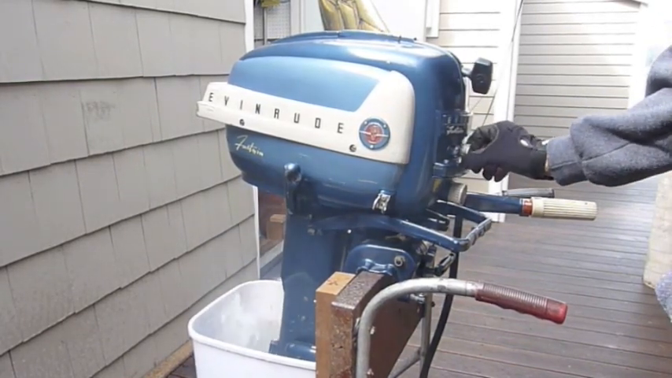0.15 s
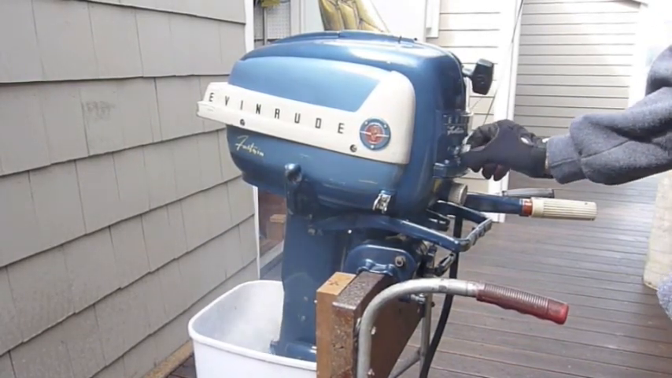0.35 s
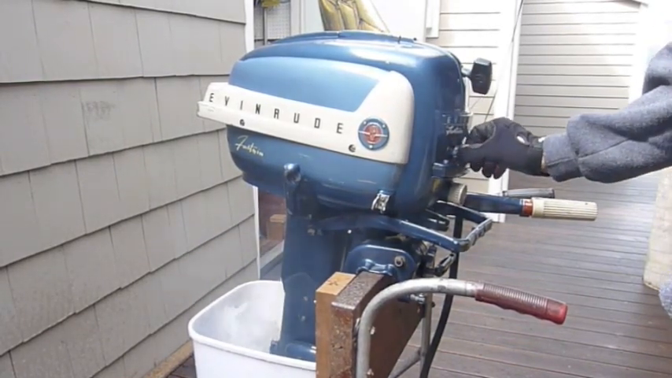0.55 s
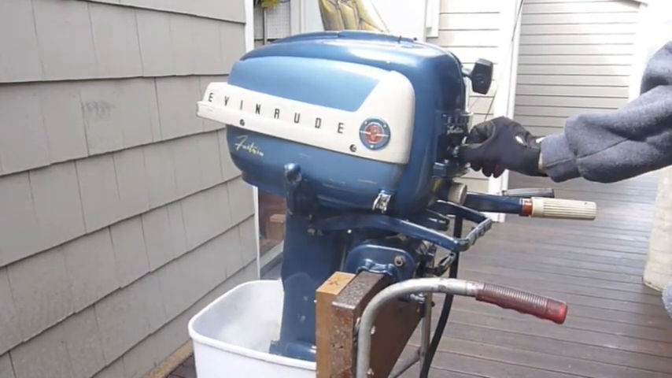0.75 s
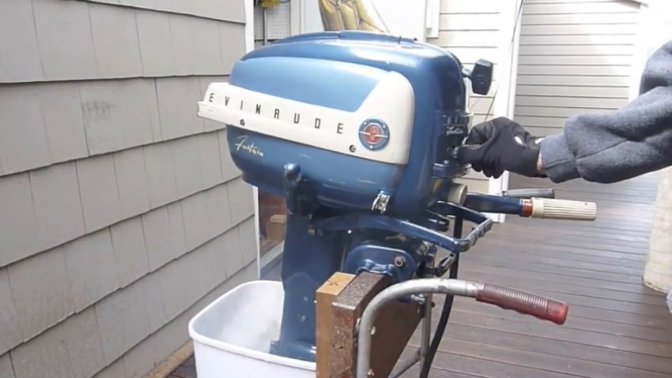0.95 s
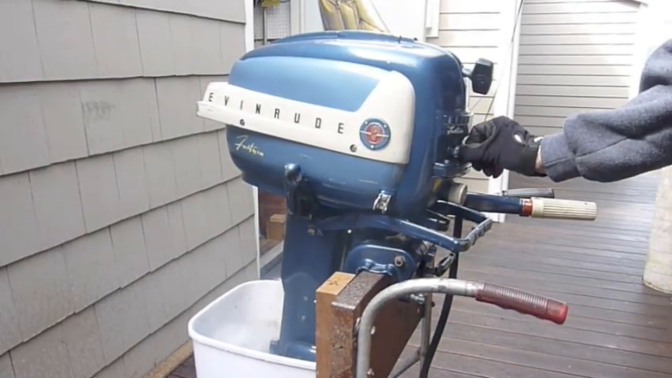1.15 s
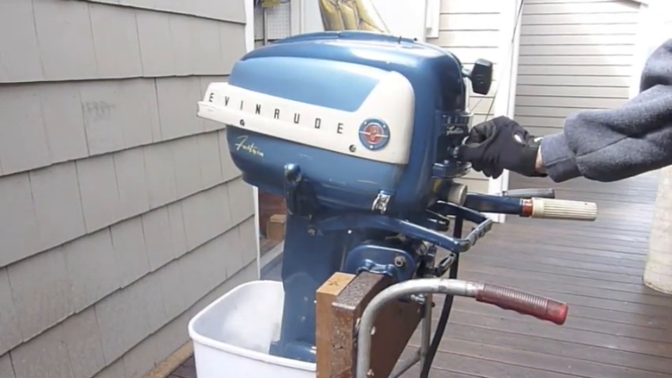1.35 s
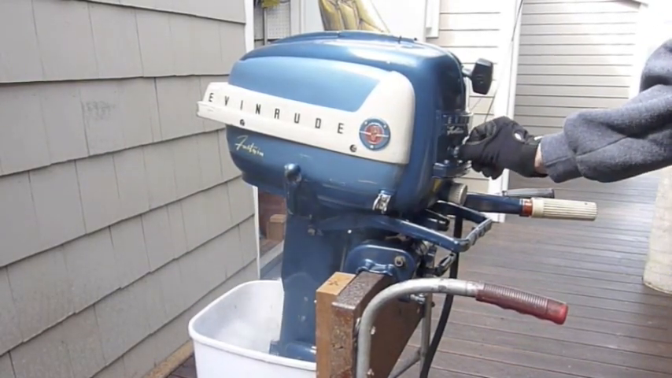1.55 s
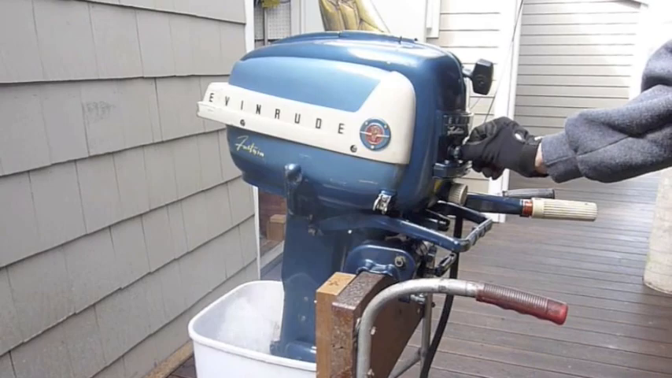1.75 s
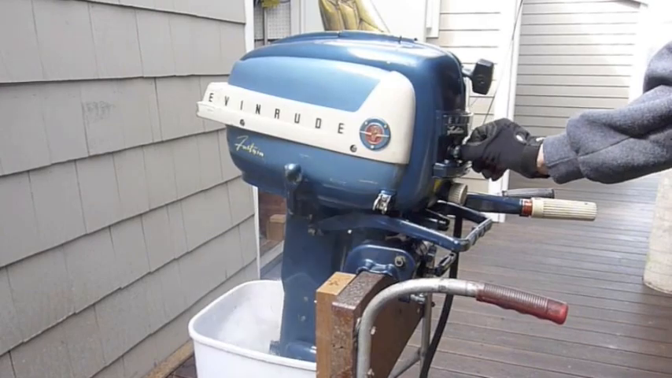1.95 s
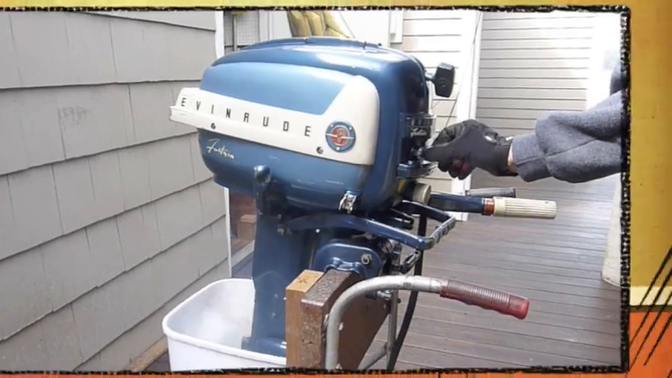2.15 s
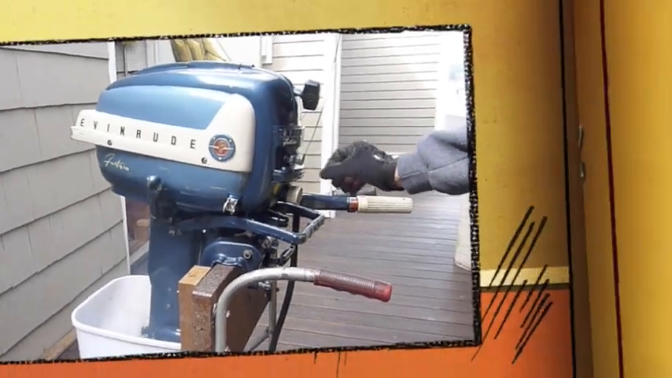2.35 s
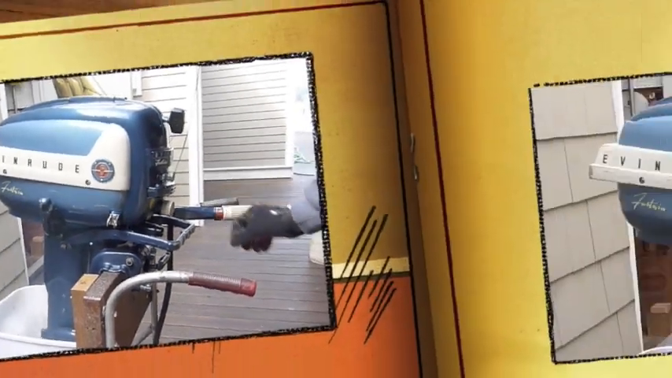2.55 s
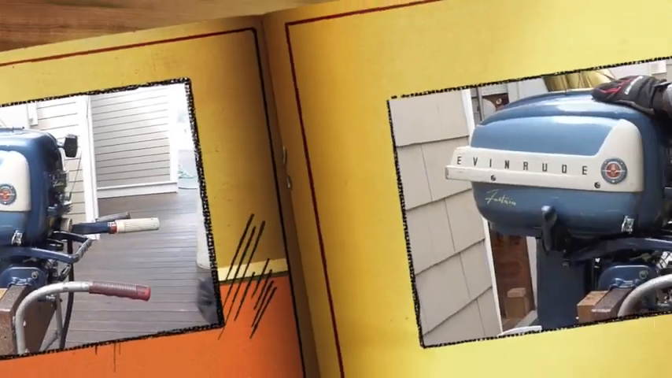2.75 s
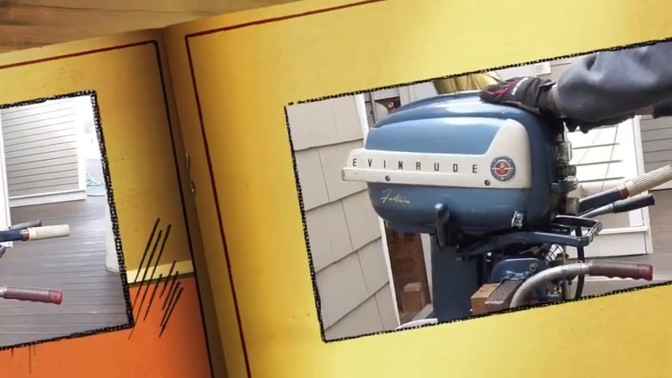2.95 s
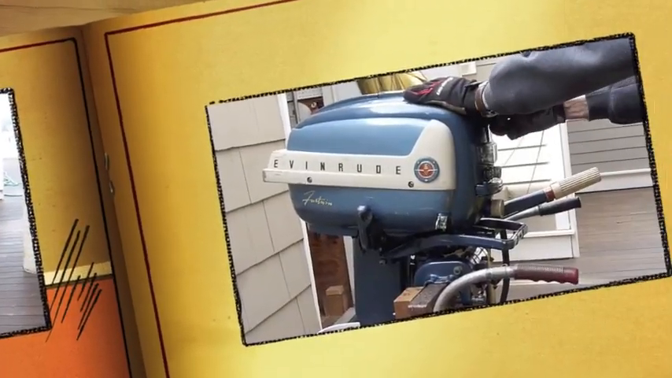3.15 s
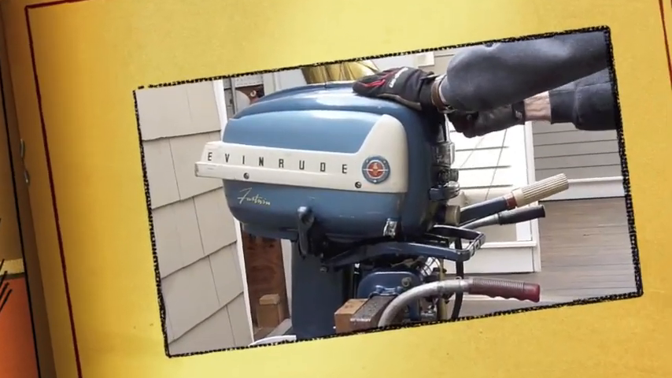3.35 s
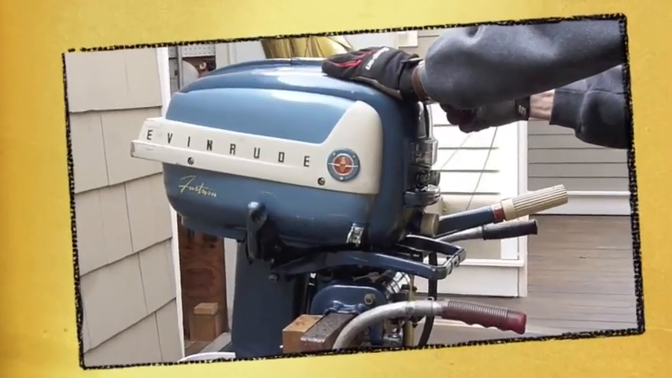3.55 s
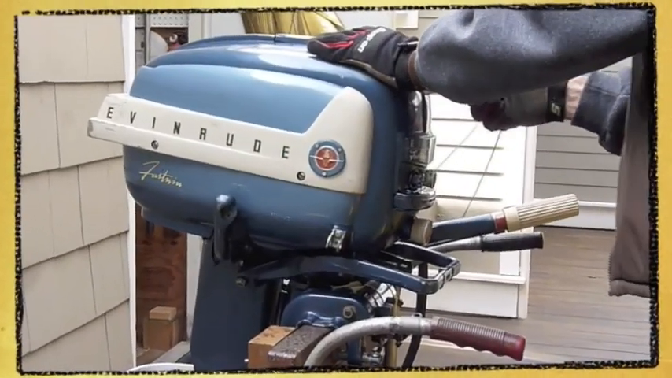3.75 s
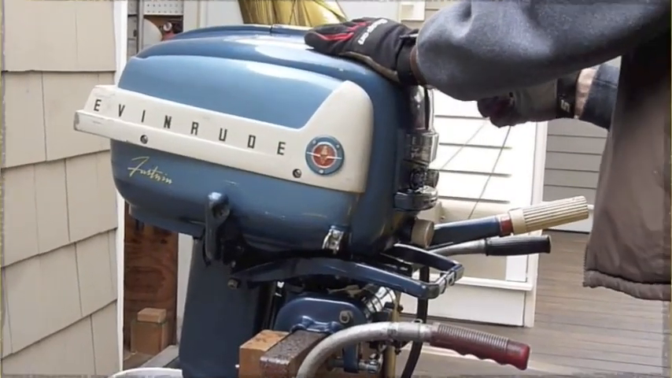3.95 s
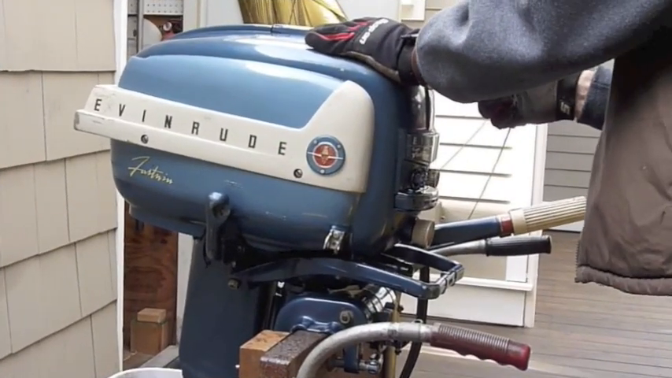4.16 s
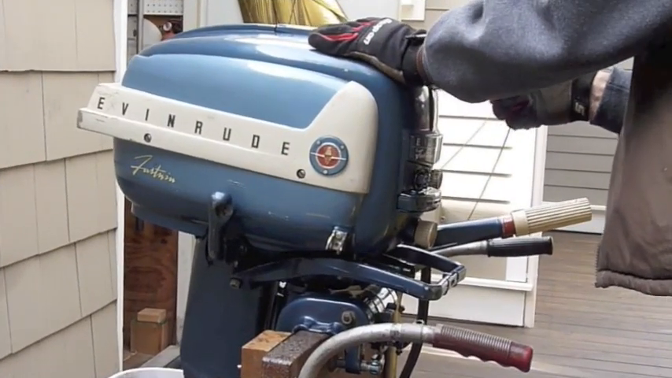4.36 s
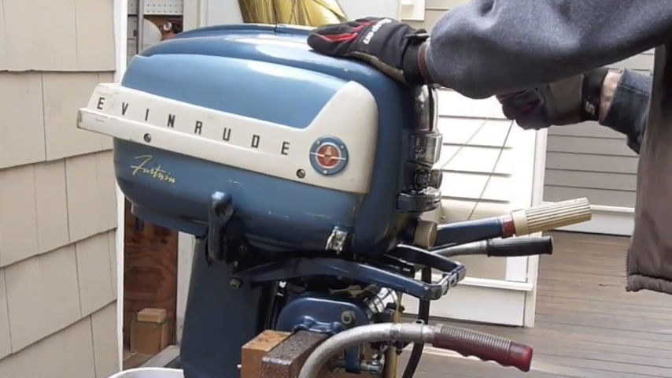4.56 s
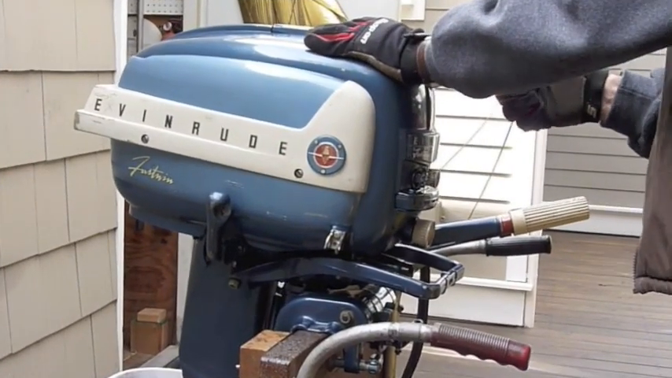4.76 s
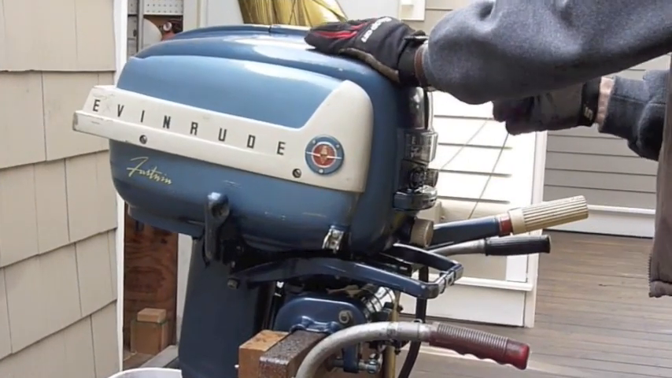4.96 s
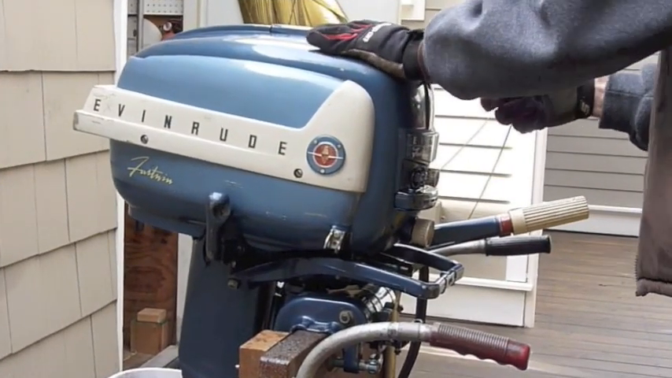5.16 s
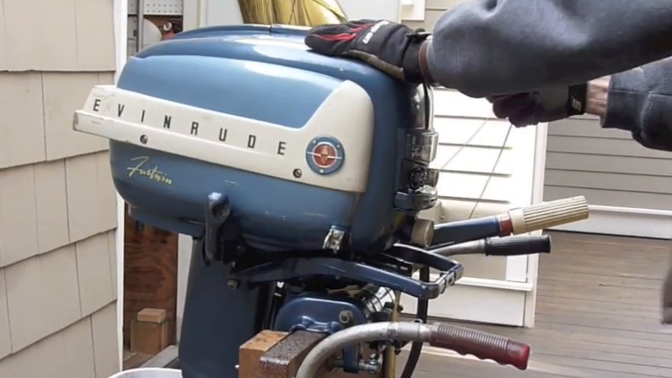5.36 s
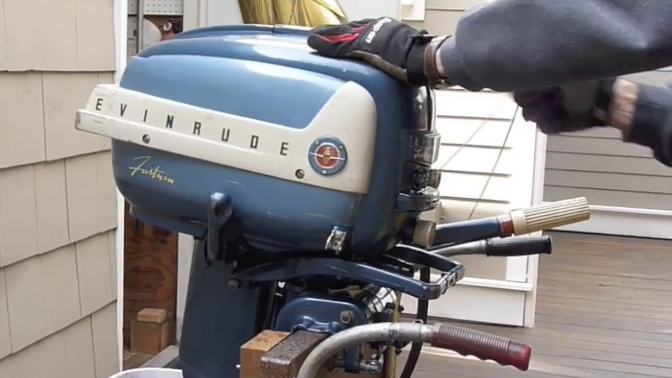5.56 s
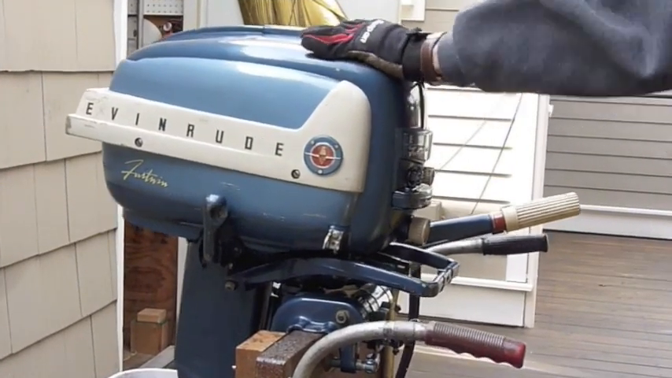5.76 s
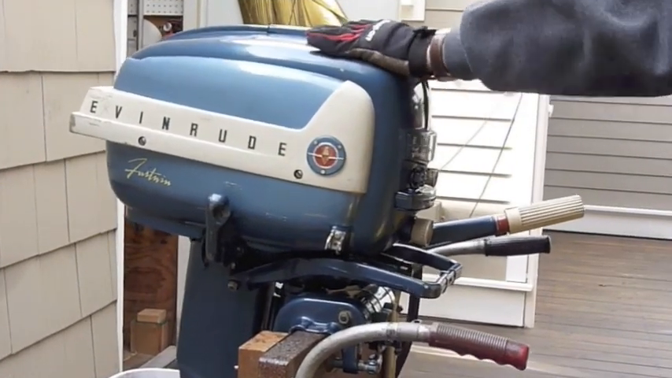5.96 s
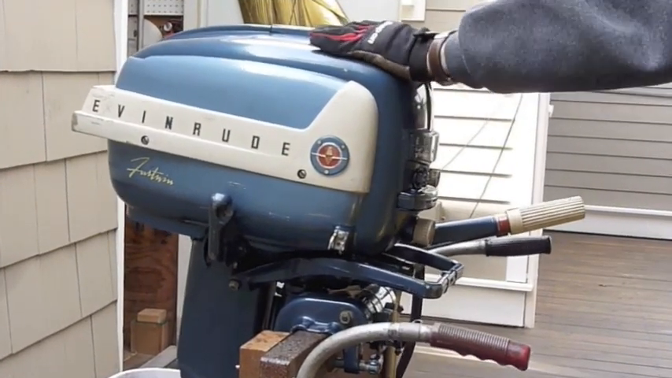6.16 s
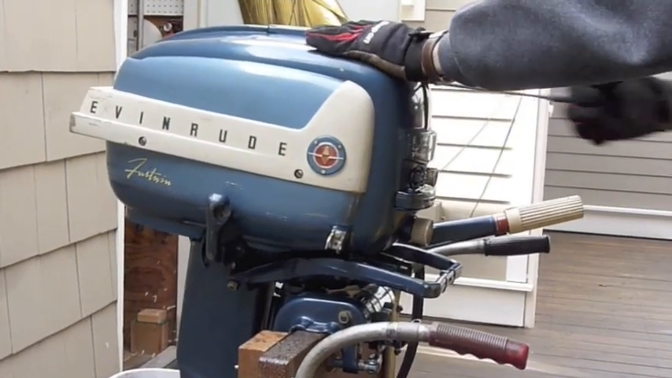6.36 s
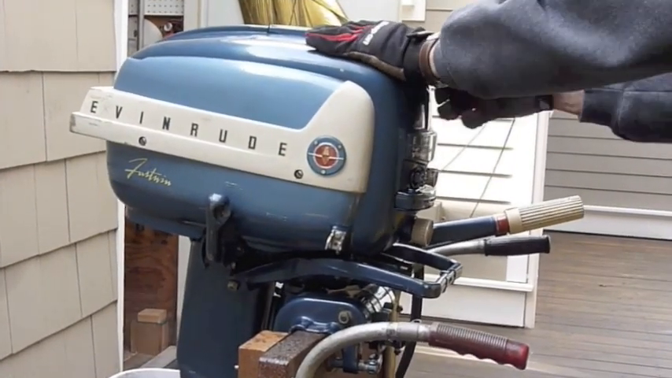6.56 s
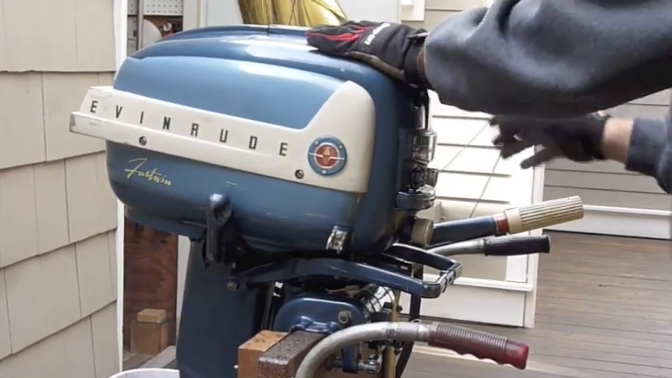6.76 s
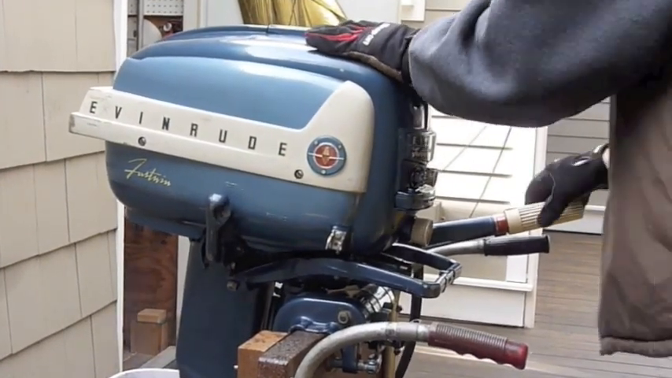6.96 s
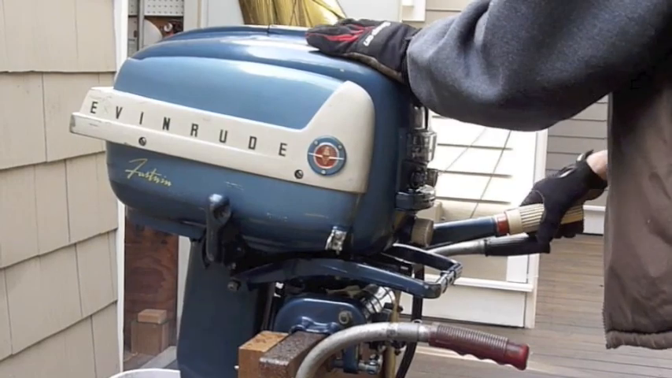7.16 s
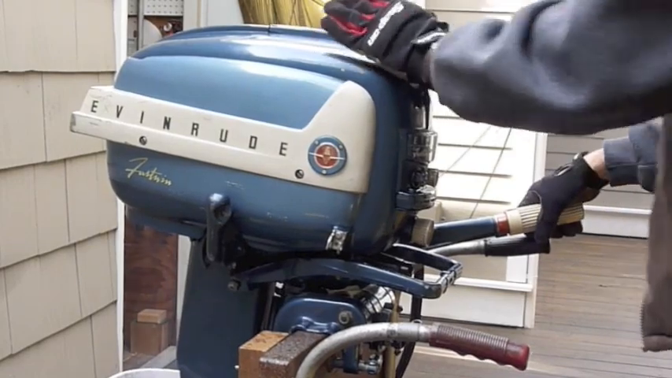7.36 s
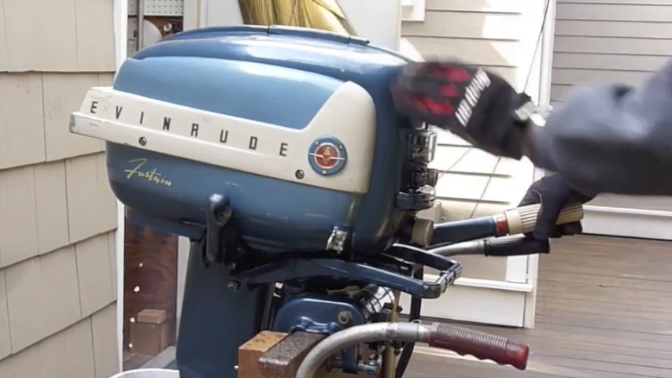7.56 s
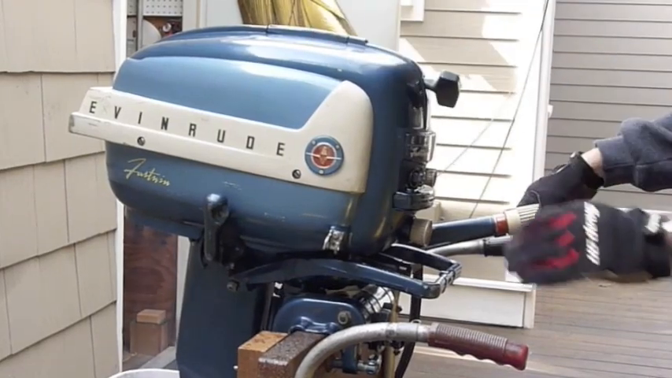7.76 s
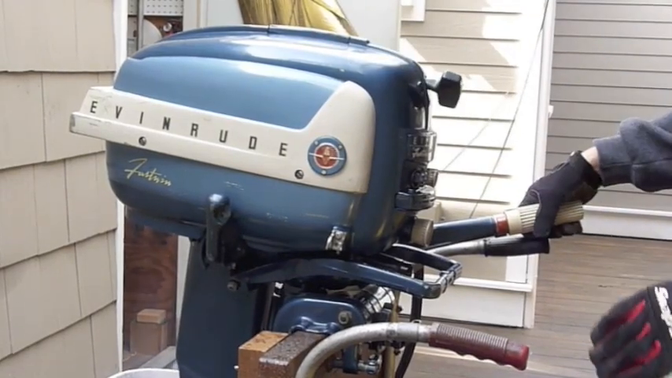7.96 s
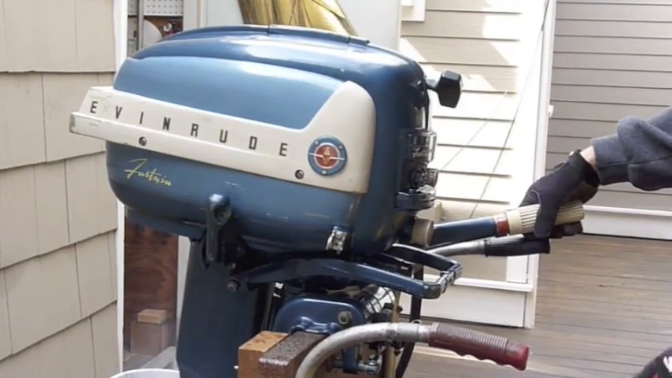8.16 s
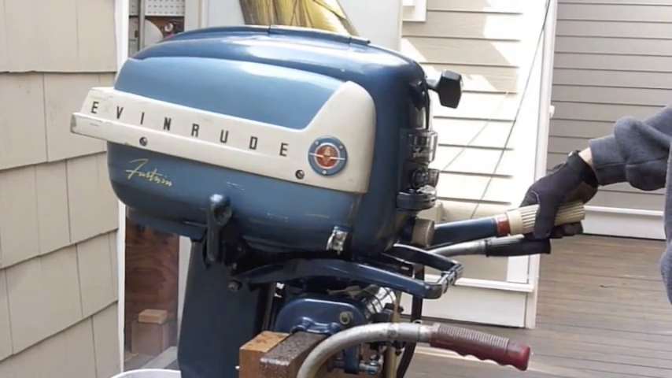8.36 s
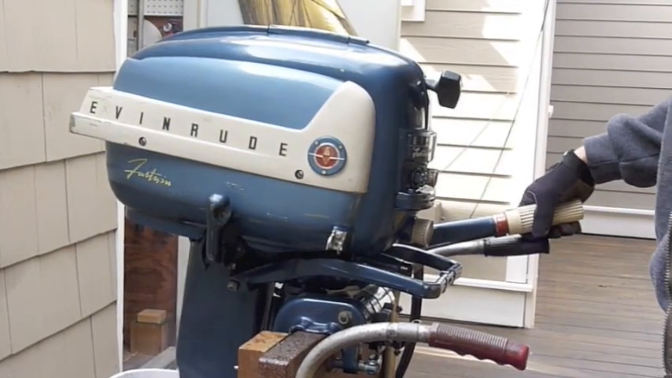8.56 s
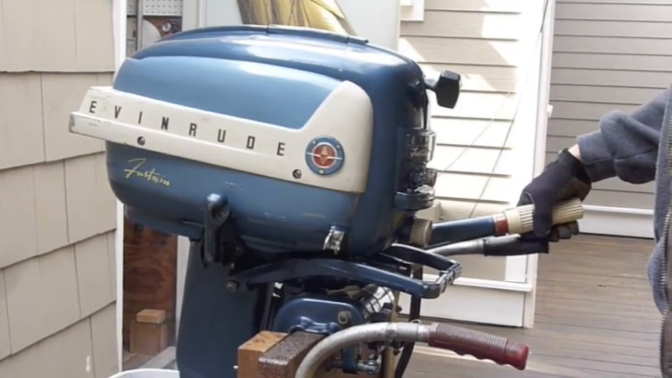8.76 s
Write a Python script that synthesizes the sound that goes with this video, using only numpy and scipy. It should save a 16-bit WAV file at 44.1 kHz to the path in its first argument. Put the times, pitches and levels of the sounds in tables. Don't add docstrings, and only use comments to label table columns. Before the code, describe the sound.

A small boat motor chugs at fast, loose idle, its exhaust popping and burbling in a water tub, with brief reflections from house walls. The sound dwindles to nothing. After quiet air, soft fumbling and sleeve rustle, a sharp rope yank rasps and ratchets; the engine fires, races briefly, then slows to uneven chugging until the end. The sound is slightly dull at the top.

```python
import sys
import numpy as np
from scipy import signal
from scipy.fft import rfft, irfft
from scipy.io import wavfile
from scipy.ndimage import uniform_filter1d

SR = 44100
rng = np.random.default_rng(int(sys.argv[2]) if len(sys.argv) > 2 else 0)


def materialize(psi):
    bounded = np.clip(np.atleast_2d(psi).T, -1, 1)
    quanta = np.round(bounded * 32767).astype(np.int16)
    wavfile.write(sys.argv[1], SR, quanta)


def natural_amplitude(level_db):
    exponent = np.asarray(level_db, float) / 20
    return 10 ** exponent


N = 388080
T = np.arange(N) / SR

CUT_S = 3.105
SLACK_S = 5.556

# [f/Hz, width/Hz, gain/dB]
TUB_IDLE = [(112, 17, -12), (144.13, 23.1, -7.5), (181, 43.7, -8.5), (238.6, 15.85, -1), (262.9, 28, -5),
            (328.3, 20.4, 0), (404.7, 44, -9), (473.4, 40.2, -6), (530, 42, -7.5), (634.7, 79, -8.5)]
TUB_START = [(149.5, 39, -13), (213, 11.45, -2.5), (237.9, 11.2, 2), (298, 13.4, 0), (339.8, 21.34, -3.5),
             (403.65, 35.8, -4.5), (445, 25, -7), (517, 45, -7), (597, 55, -8.5), (758, 41, -8)]
# [t/s, peak/dB, bubble note f/Hz]
POPS_IDLE = [(0.107, -17, 326), (0.152, -17, 333), (0.244, -19.5, 317), (0.288, -19, 250),
             (0.334, -16, 334), (0.387, -18, 301), (0.423, -14.5, 334), (0.516, -17.5, 323),
             (0.609, -21, 336), (0.663, -15, 320), (0.701, -16.5, 323), (0.884, -19, 325),
             (0.925, -14, 248), (1.019, -19, 220), (1.059, -17, 320), (1.113, -17, 246), (1.159, -17, 318),
             (1.192, -16, 330), (1.239, -11.5, 331), (1.283, -17, 458), (1.322, -16.5, 326),
             (1.417, -16, 180), (1.479, -18, 468), (1.513, -14, 320), (1.546, -16, 326),
             (1.593, -15.5, 326), (1.637, -13.5, 236), (1.681, -17, 242), (1.771, -11.5, 322),
             (1.829, -19, 447), (1.902, -16.5, 237), (1.946, -12, 318), (1.994, -15, 243),
             (2.084, -16, 299), (2.125, -15.5, 307), (2.17, -19, 331), (2.209, -17.5, 331),
             (2.302, -18.5, 323), (2.347, -16, 299), (2.476, -21.5, 324), (2.565, -20.5, 320),
             (2.611, -21, 245), (2.648, -22.5, 288), (2.693, -21.5, 302), (2.742, -22.5, 326),
             (2.783, -24.5, 248), (2.87, -29, 234), (2.912, -29, 320)]
POPS_START = [(6.145, -19, 231), (6.189, -16, 229), (6.229, -9, 296), (6.277, -10.5, 237),
              (6.383, -12.5, 231), (6.419, -10.5, 240), (6.45, -13, 248), (6.484, -13, 315),
              (6.521, -13, 301), (6.559, -11, 237), (6.59, -9, 298), (6.66, -11.5, 299), (6.696, -14, 234),
              (6.728, -10.5, 299), (6.796, -10.5, 296), (6.833, -16, 302), (6.865, -11.5, 299),
              (6.935, -12, 336), (6.969, -14, 242), (7.006, -7.5, 296), (7.078, -14, 242),
              (7.117, -14, 231), (7.153, -13, 296), (7.19, -13, 234), (7.227, -11, 223), (7.303, -12, 300),
              (7.354, -18.5, 237), (7.42, -17.5, 240), (7.462, -15.5, 294), (7.502, -15, 237),
              (7.575, -18.5, 240), (7.616, -14.5, 436), (7.696, -13.5, 226), (7.734, -15, 234),
              (7.775, -13.5, 295), (7.817, -11, 231), (7.859, -10, 230), (7.901, -14, 231),
              (7.938, -19, 213), (7.992, -17, 229), (8.028, -12, 296), (8.156, -17.5, 293),
              (8.201, -10.5, 345), (8.244, -11.5, 223), (8.283, -13, 221), (8.328, -16.5, 288),
              (8.377, -10.5, 369), (8.412, -13, 238), (8.449, -10.5, 295), (8.487, -10, 288),
              (8.532, -15, 221), (8.582, -21, 223), (8.615, -15, 296), (8.657, -13.5, 233),
              (8.696, -15.5, 218), (8.742, -14.5, 226)]


def evened(x):
    return x / np.sqrt(np.mean(x ** 2) + 1e-20)


def curve(rows, column=1):
    return np.interp(T, [r[0] for r in rows], [r[column] for r in rows])


def colour(x, points):
    hz, db = np.transpose(points)
    log_hz = np.log(np.fft.rfftfreq(N, 1 / SR) + 1)
    return irfft(rfft(x) * natural_amplitude(np.interp(log_hz, np.log(hz), db)), N)


def above(x, hz):
    return signal.sosfilt(signal.butter(3, hz, "high", fs=SR, output="sos"), x)


def ring(x, modes):
    out = np.zeros(len(x))
    for hz, width_hz, db in modes:
        r = np.exp(-np.pi * width_hz / SR)
        angle = 2 * np.pi * hz / SR
        gain = natural_amplitude(db) * 2 * (1 - r) * np.sin(angle)
        out += gain * signal.lfilter([0, 1], [1, -2 * r * np.cos(angle), r * r], x)
    return out


def train(s, size):
    keep = (s >= 0) & (s < N / SR - 1 / SR)
    return np.bincount((s[keep] * SR).astype(int), size[keep], N)


def die(clicks, t60):
    return signal.lfilter([1], [1, -10 ** (-3 / (t60 * SR))], clicks)


def fade():
    fade_out_s, fade_in_s = 0.96, 0.905
    return np.clip(np.maximum((CUT_S - T) / fade_out_s, (T - CUT_S) / fade_in_s), 1e-5, 1)


def unfaded_db(s, db):
    return db - 20 * np.log10(fade()[(s * SR).astype(int)])


def bursts(events, t60, tone, crest_db):
    s, db = np.transpose(events)
    envelope = uniform_filter1d(die(train(s, natural_amplitude(unfaded_db(s, db - crest_db))), t60), 50)
    return envelope * evened(colour(rng.standard_normal(N), tone))


def swell(start, end, db, rise_db, fall_db):
    return natural_amplitude(db - rise_db * np.maximum(start - T, 0) - fall_db * np.maximum(T - end, 0))


def turning(speed, turn):
    s = np.linspace(speed[0][0], speed[-1][0], num=400)
    rate = np.interp(s, *np.transpose(speed))
    return np.transpose([s, turn + (np.cumsum(rate) - (rate + rate[0]) / 2) * (s[1] - s[0])])


def moments(crank, place, jitter):
    s, turns = np.transpose(crank)
    whole = np.arange(np.floor(turns[0]) - 1, turns[-1] + 1)
    scattered = whole + place + jitter * rng.standard_normal(len(whole))
    return np.interp(scattered, turns, s, left=-1, right=-1)


def running(crank):
    on = uniform_filter1d(1. * (T >= crank[0][0]) * (T <= crank[-1][0]), 900)
    return on * ((T < CUT_S) == (crank[0][0] < CUT_S))


def blows(expected):
    # [t/s, peak/dB]
    blows_idle = [(0.0144, -19), (0.0611, -16), (0.1038, -16.5), (0.1486, -16), (0.196, -13.5),
                  (0.2423, -15.5), (0.2885, -16.5), (0.3346, -15.5), (0.379, -14), (0.4239, -16.5),
                  (0.4653, -17.5), (0.5108, -15.5), (0.5596, -15), (0.6095, -17), (0.654, -15),
                  (0.6988, -15.5), (0.7437, -15), (0.7911, -17.5), (0.8365, -14), (0.8844, -15),
                  (0.9258, -16), (0.9677, -17), (1.0141, -17), (1.0575, -16), (1.1024, -15.5),
                  (1.1453, -15.5), (1.1902, -15), (1.2334, -12.5), (1.278, -18), (1.3209, -17.5),
                  (1.3673, -16.5), (1.4127, -15.5), (1.4556, -14), (1.5, -16), (1.5454, -17),
                  (1.5918, -14.5), (1.6347, -14.5), (1.6781, -16), (1.7215, -17), (1.7649, -14),
                  (1.81, -15.5), (1.8535, -17), (1.8978, -17.5), (1.941, -17.5), (1.9879, -18),
                  (2.0338, -16), (2.0777, -16), (2.1213, -16), (2.1691, -15.5), (2.2116, -18),
                  (2.2997, -17), (2.3426, -18.5), (2.386, -17.5), (2.4322, -20.5), (2.4753, -19),
                  (2.5212, -23), (2.5636, -22), (2.6065, -22), (2.6953, -22.5), (2.8667, -26)]
    blows_start = [(6.1889, -16.5), (6.2305, -19.5), (6.2697, -18), (6.307, -17), (6.3455, -20.5),
                   (6.3824, -16.5), (6.4188, -17.5), (6.4515, -17.5), (6.4907, -16.5), (6.523, -16.5),
                   (6.557, -17), (6.5899, -19.5), (6.66, -14), (6.7326, -17), (6.795, -19.5), (6.8344, -20),
                   (6.864, -17), (6.9002, -19.5), (6.9416, -19), (6.9691, -19.5), (7.005, -18.5),
                   (7.0778, -19.5), (7.155, -18.5), (7.225, -19), (7.268, -18), (7.3088, -17),
                   (7.3457, -20.5), (7.379, -17.5), (7.4226, -19), (7.4586, -17), (7.4974, -19),
                   (7.5353, -15.5), (7.577, -16), (7.6126, -16.5), (7.6954, -19), (7.7388, -14),
                   (7.7753, -16), (7.8172, -18), (7.8566, -16.5), (7.9035, -19), (7.9414, -16),
                   (7.9846, -15), (8.0267, -15.5), (8.1105, -16.5), (8.1529, -17.5), (8.1983, -18),
                   (8.2452, -19), (8.2826, -18.5), (8.324, -15.5), (8.3674, -15), (8.4113, -17),
                   (8.4487, -18.5), (8.4901, -20.5), (8.5295, -18), (8.5746, -17.5), (8.6133, -19.5),
                   (8.6533, -20), (8.6957, -18), (8.7384, -18), (8.783, -17)]
    average_db = -16.5
    s, db = np.transpose(blows_idle + blows_start)
    db = unfaded_db(s, db - average_db)
    near = np.abs(s - expected[:, None]).argmin(axis=1)
    found = np.abs(s[near] - expected) < .014
    return found * (s[near] - expected), np.where(found, db[near], -2.5)


def patchy(x, crank):
    z = signal.stft(x, nperseg=256)[2]
    frame_at = np.minimum(np.arange(z.shape[1]) * 128, N - 1)
    turn = np.floor(curve(crank) + .1).astype(int)[frame_at]
    tint = evened(uniform_filter1d(rng.standard_normal((turn.max() + 1, len(z))), size=6, axis=1))
    tint_db = 1.5 * tint[turn].T
    return signal.istft(z * natural_amplitude(tint_db), nperseg=256)[1][:N]


def clatter(crank, strikes, spectrum, cowl, uneven_db, bed, whirr_db, cowl_db):
    power = bed * running(crank)
    late_s, hard_db = blows(moments(crank, strikes[0][0], 0))
    for k, (place, db, t60) in enumerate(strikes):
        s = moments(crank, place, .012 * (k > 0)) + late_s
        if k < 2:
            db = db + 0.6 * hard_db
        else:
            db = db + uneven_db * rng.standard_normal(len(s))
        power += die(train(s, natural_amplitude(2 * db)), t60 / 2)
    shake = np.sqrt(uniform_filter1d(power, 30) + 1e-12)
    tick_size = natural_amplitude(2.29 * np.minimum(rng.exponential(1, N), 4))
    ticks = (rng.random(N) < 1800 / SR) * tick_size * rng.choice([-1, 1], N)
    panel = rng.integers(0, len(cowl), N)
    pings = sum(ring(shake ** 1.58 * ticks * (panel == k), [mode]) for k, mode in enumerate(cowl))
    whirr = colour(rng.standard_normal(N) * running(crank),
                   [(100, -25.0), (500, -2), (1400, -2), (2500, -10.5), (7000, -28.5)])
    rattle = evened(colour(patchy(shake * rng.standard_normal(N), crank), spectrum))
    return rattle + natural_amplitude(cowl_db) * evened(pings) + natural_amplitude(whirr_db) * evened(whirr)


def gulp(fire, tub, leg_hz, gurgle_db):
    foam = die(fire, 0.15) * (rng.random(N) < 260 / SR) * rng.standard_normal(N)
    puff = ring(fire + natural_amplitude(gurgle_db) * foam, [(leg_hz, 460, 0)])
    rung = sum((-1) ** k * ring(puff, [mode]) for k, mode in enumerate(tub))
    return above(rung, 0.74 * tub[0][0])


def exhaust(crank, tub, leg_hz, place, uneven_db, second_db, gurgle_db, thud_db):
    first = moments(crank, place, 0.01418)
    second = moments(crank, place + 0.49, .07)
    size = natural_amplitude(uneven_db * rng.standard_normal(len(first)))
    thud = above(ring(train(first, size), [(93.7, 52, 0)]), 64)
    pop_s = np.transpose(POPS_IDLE + POPS_START)[0]
    popped = np.abs(first[:, None] - pop_s).min(axis=1) < .016
    fire = train(first, size * ~popped)
    fire += train(second, natural_amplitude(second_db + uneven_db * rng.standard_normal(len(second))))
    return evened(gulp(fire, tub, leg_hz, gurgle_db)) + natural_amplitude(thud_db) * evened(thud)


def hum(crank, orders):
    turns = curve(crank)
    out = np.zeros(N)
    for k, db in orders:
        waver = evened(uniform_filter1d(uniform_filter1d(rng.standard_normal(N), 4000), 2000))
        level = natural_amplitude(db + (1.4 + .3 * k) * waver)
        out += level * np.sqrt(2) * np.sin(2 * np.pi * (k * turns + rng.random()))
    return out


def motor(crank, speed, load, rattle, gas, orders):
    tickover_turns_per_s, catch_s = 23, 6.18
    share = np.sqrt(running(crank).mean())
    fast = curve(speed) - tickover_turns_per_s
    coasting = uniform_filter1d(1. * (T > CUT_S) * (T < catch_s), size=500)
    rattle_db, rattle_slope, gas_db, gas_slope = load
    rattle_db = rattle_db + rattle_slope * fast - 2.5 * coasting
    gas_db = gas_db + gas_slope * fast - 5.5 * coasting
    sound = share * (natural_amplitude(rattle_db) * rattle + natural_amplitude(gas_db) * gas)
    return running(crank) * (sound + hum(crank, orders) * natural_amplitude(-10 * coasting))


def idling_motor():
    # [t/s, turns/s]
    speed = [(0, 22.38), (.62, 21.49), (.94, 22.66), (2.38, 22.48), (3.12, 23.91)]
    # [place/turns, level/dB, t60/s]
    strikes = [(.01, 1.5, 0.1216), (0.078, -1, 0.1669), (.16, -7, 0.003), (.26, -8.5, 0.0383),
               (.52, -10.5, 0.4), (0.741, -12, 0.3)]
    # [f/Hz, level/dB per Hz]
    spectrum = [(60, -30.5), (200, -9), (500, 1.5), (1200, -2), (1800, -6.5), (2300, -4), (3500, -4.5),
                (4500, -5.5), (6000, -6), (7500, -10.5)]
    # [f/Hz, width/Hz, gain/dB]
    cowl = [(1142, 31, 1), (1387, 140, -2), (1852, 85, -1.5), (2621, 120, -6), (2903, 94, -8.5),
            (3454, 150, -0.5), (3693.5, 64, -3), (4206, 110, -5.5), (4680, 100, -4.5), (6150, 110, -7)]
    # [multiple, rms/dB]
    orders = [(1, -61), (2, -52.5), (3, -58), (4, -57), (5, -45), (6, -46.5), (8, -44)]
    load = (-27.5, 0.3, -28.5, 1)
    crank = turning(speed, .67)
    rattle = clatter(crank, strikes, spectrum, cowl, uneven_db=1.5, bed=0.052, whirr_db=-5.5, cowl_db=-6.0)
    gas = exhaust(crank, TUB_IDLE, leg_hz=340, place=0.0402, uneven_db=1.5, second_db=-1.8,
                  gurgle_db=-6.0, thud_db=-20.5)
    return motor(crank, speed, load, rattle, gas, orders)


def pops():
    note_db, note_t60_s, note_rise_s, note_late_s = -8, .14, .003, .011
    gas_lead_s = .008
    # [f/Hz, width/Hz, gain/dB]
    splash, splash_db = [(560, 90, 0), (680, 100, -2), (790, 80, -3)], -20
    s, db, note_hz = np.transpose(POPS_IDLE + POPS_START)
    db = unfaded_db(s, db)
    out, t = np.zeros(N + 6000), np.arange(6000) / SR
    late = np.maximum(t - note_late_s, 0)
    envelope = natural_amplitude(note_db - 60 * late / note_t60_s) * (1 - np.exp(-late / note_rise_s))
    for at, level_db, hz in zip(s, db, note_hz):
        out[int(at * SR):][:len(t)] += natural_amplitude(level_db) * envelope * np.sin(2 * np.pi * hz * late)
    fired = train(s, natural_amplitude(db))
    froth = evened(ring(rng.standard_normal(N), splash)) * uniform_filter1d(die(fired, .16), 200)
    thump = above(ring(fired, [(108, 45, 0)]), 70)
    out = out[:N] + natural_amplitude(splash_db) * froth + natural_amplitude(22.5) * thump
    for late_s, leg_hz, gain_db in [(0, 378, 42), (.013, 604, 34.8)]:
        push_s = s - gas_lead_s + late_s * rng.uniform(0.901, 1.1045, len(s))
        push = train(push_s, natural_amplitude(db + gain_db))
        out += gulp(push * (T < CUT_S), TUB_IDLE, leg_hz, -8.0)
        out += gulp(push * (T > CUT_S), TUB_START, leg_hz, -8.0)
    return out


def piston_slaps():
    # [t/s, peak/dB]
    slaps = [(0.2427, -18.5), (0.6536, -19), (0.7424, -14), (0.8368, -9.5), (0.884, -15.5), (1.2336, -9.5),
             (2.5675, -29), (2.9099, -31), (6.7281, -13.5), (7.0766, -20), (7.7452, -12.5), (8.2015, -20),
             (8.324, -14.5)]
    return bursts(slaps, 0.068, [(500, -18.0), (1500, -0.5), (3500, -1.0), (7000, -6.5)], 13.0)


def walls(x):
    t = np.arange(6000) / SR
    echoes = rng.choice([-1., 1.], len(t)) * (rng.random(len(t)) < 2500 / SR)
    tail = echoes * natural_amplitude(-60 * t / 0.1) * (t > .004)
    wet = signal.oaconvolve(x, tail / np.linalg.norm(tail))[:N]
    return x + natural_amplitude(-12.0) * above(wet, 400)


def yard():
    # [f/Hz, level/dB per Hz]
    hush = [(18, -35), (30, -17.5), (59, -5.5), (204, -2.5), (386, -6), (453, -3.5), (485, -5), (766, -9),
            (1290, -13.5), (1910, -15), (7000, -25), (9100, -64.5), (15400, -120)]
    # [start/s, end/s, level/dB]
    rustles = [
        (3.78, 3.81, -57),
        (5.194, 5.801, -58),
    ]
    # [t/s, peak/dB, t60/s, tilt/dB per octave]
    fumbles = [
        (3.289, -61.5, 0.132, -3),
        (3.457, -49, 0.25, -4.5),
        (3.493, -44.5, 0.154, -4.5),
        (3.76, -44.5, 0.152, -5),
        (3.83, -47.5, 0.157, -4.5),
        (5.436, -31.5, 0.17, 1),
        (5.557, -41, 0.17, -9),
    ]
    gust = evened(uniform_filter1d(rng.standard_normal(N), 3000))
    air = natural_amplitude(-56 + 0.61 * gust) * evened(colour(rng.standard_normal(N), hush))
    grains = (rng.random(N) < 2500 / SR) * rng.standard_normal(N)
    cloth = evened(colour(grains, [(200, -7.5), (800, -1), (3000, -6.0), (7000, -12)]))
    air += sum(swell(*row, rise_db=44.5, fall_db=141) for row in rustles) * cloth
    for s, db, t60, tilt_db in fumbles:
        tone = evened(colour(rng.standard_normal(N), [(150, -11.0), (600, 2.5), (9600, 4 * tilt_db)]))
        envelope = uniform_filter1d(die(train(np.array([s]), np.ones(1)), t60), 40)
        air += natural_amplitude(db - 5) * envelope * tone / fade()[int(s * SR)]
    return air * (T > CUT_S)


def starter():
    # [f/Hz, width/Hz, gain/dB]
    housing = [(240, 97, -9), (301, 36, -6.5), (587, 40, 2), (785, 65, 0), (1137, 105, -3),
               (1340, 120, -10.5), (1610, 130, -6.5), (2035, 120, -7.5), (2250, 115, -7.5),
               (3200, 300, -14)]
    # [t/s, peak/dB]
    knocks = [(5.7182, -15.5), (5.7757, -13), (5.8056, -8), (5.8314, -21.5), (5.8813, -13.5), (5.9491, -14),
              (5.9994, -23.5), (6.0514, -14), (6.0995, -30), (6.1465, -15.5), (6.188, -13)]
    yank_s, hold_s = 5.745, 0.015
    slips = (rng.random(N) < 7000 / SR) * rng.standard_normal(N)
    dull = evened(above(ring(slips, housing), 230))
    bright = evened(colour(slips, [(200, -46.5), (600, -7.5), (2500, 0.5), (5000, -4.0), (7500, -14.0)]))
    yank = swell(yank_s, yank_s + hold_s, db=-19, rise_db=450, fall_db=180)
    slack = swell(SLACK_S, yank_s, db=-55, rise_db=900, fall_db=890)
    knock = bursts(knocks, 0.15, [(400, -6.0), (1000, 0.5), (4000, 0.5), (7000, -5)], 9.2)
    rasp = (yank + slack) * dull + (0.7 * yank + 0.21 * slack) * bright
    return rasp + knock + natural_amplitude(8.0) * ring(knock, housing[2:6])


def starting_motor():
    # [t/s, turns/s]
    speed = [(5.76, 20.44), (6.16, 21.63), (6.29, 26.8), (6.65, 29.92), (7.22, 26.5), (7.81, 24.39),
             (8.24, 22.88), (8.41, 24.92), (8.8, 23.52)]
    # [place/turns, level/dB, t60/s]
    strikes = [(-.02, 0, 0.1), (.08, -0.5, .09), (.18, -5.5, 0.1), (.3, -6.5, 0.11), (.52, -6, .12),
               (.75, -7.5, 0.088)]
    # [f/Hz, level/dB per Hz]
    spectrum = [(60, -30.5), (200, -9.5), (500, -3.5), (1400, -0.5), (1800, -7), (2500, -5.5), (3400, -6),
                (4500, -8.5), (6000, -6), (7500, -9.5)]
    # [f/Hz, width/Hz, gain/dB]
    cowl = [(1388.7, 100, -2), (2016, 78, -4), (2180.5, 23, -10.5), (2743, 56, -4), (3070, 77, -3),
            (3386, 100, -1.5), (3850, 110, -4), (4210, 56, -2), (4810, 120, -5), (5880, 86, -6),
            (6560, 65, -3)]
    # [multiple, rms/dB]
    orders = [(1, -56), (2, -47.5), (3, -47.5), (4, -44.5), (5, -48), (6, -45.5), (7, -47), (8, -43.5),
              (9, -42)]
    load = (-28, -0.2, -33.5, 0.67)
    crank = turning(speed, .953)
    rattle = clatter(crank, strikes, spectrum, cowl, uneven_db=1.72, bed=0.028, whirr_db=-4.5, cowl_db=-6.5)
    gas = exhaust(crank, TUB_START, leg_hz=340, place=-0.1295, uneven_db=1.2, second_db=-4.0,
                  gurgle_db=-7.5, thud_db=-18.5)
    return motor(crank, speed, load, rattle, gas, orders)


def scene():
    machine = walls(idling_motor() + pops() + piston_slaps() + starter() + starting_motor())
    heard = (T < CUT_S) | (T > SLACK_S - .03)
    return (machine * heard + yard())[None]


def top_cut(x):
    return signal.sosfilt(signal.butter(12, 8370, fs=SR, output="sos"), x)


def record(dry):
    # [f/Hz, level/dB]
    edge = [(6800, 0), (7200, -3.5), (7500, -9), (7650, -15.5), (7900, -20.5), (8100, -30.5), (8330, -51.5),
            (9000, -60.5)]
    # [f/Hz, width/Hz]
    dips = [(5400, 150), (7705, 130)]
    hz = np.fft.rfftfreq(N, 1 / SR)
    z = rfft(colour(dry[0], edge))
    for dip_hz, width_hz in dips:
        z = z * np.abs(hz - dip_hz) / np.hypot(hz - dip_hz, width_hz)
    return top_cut((irfft(z, N) * fade())[None])


dry = scene()
out = record(dry)
materialize(out)
```